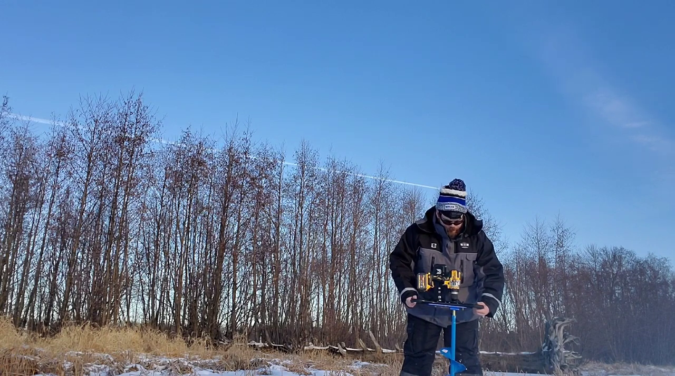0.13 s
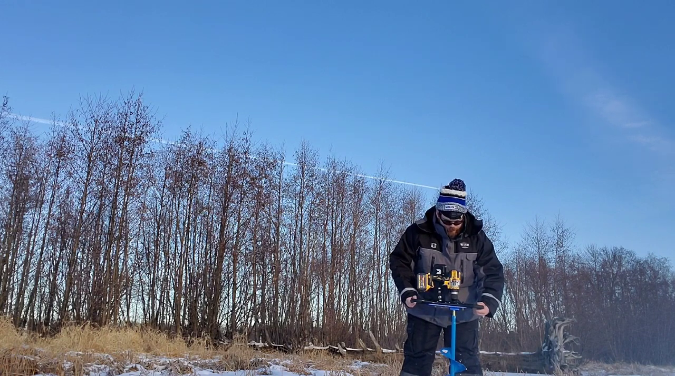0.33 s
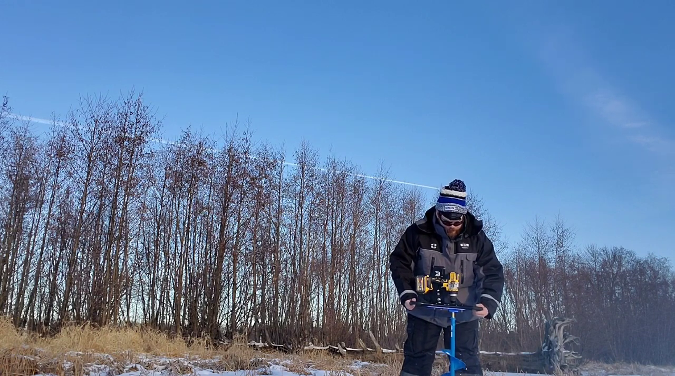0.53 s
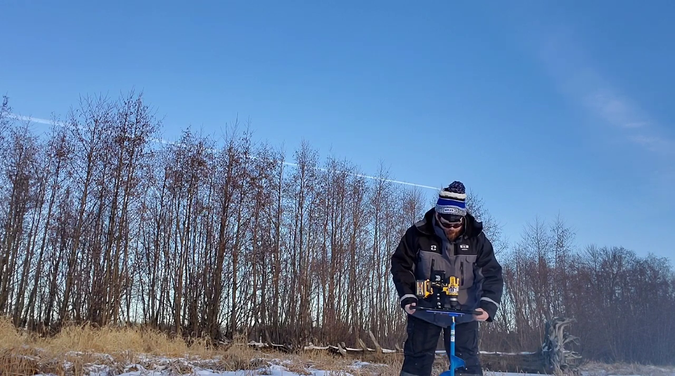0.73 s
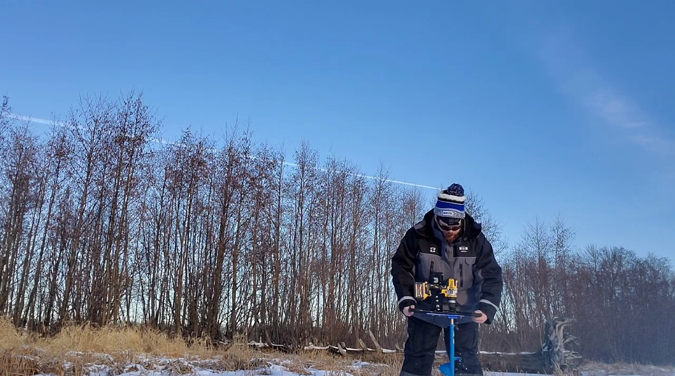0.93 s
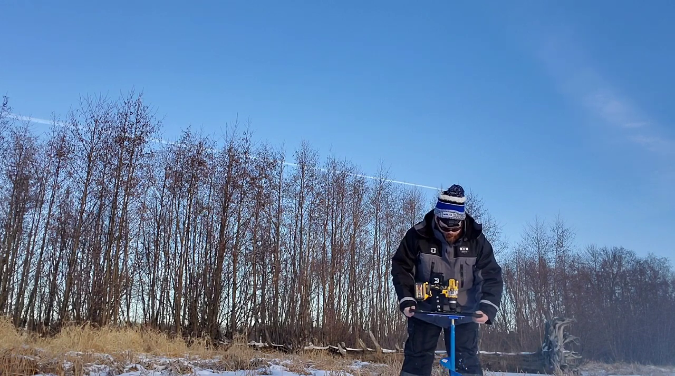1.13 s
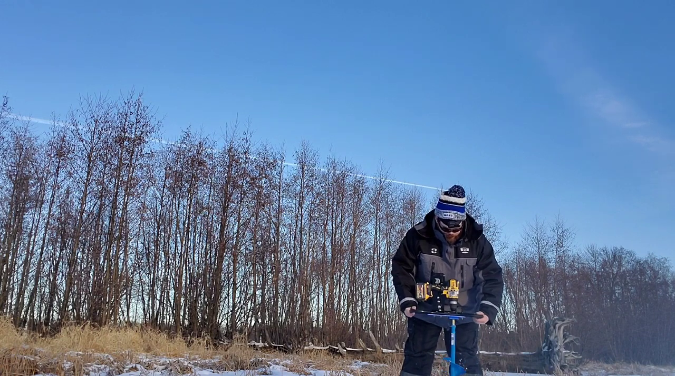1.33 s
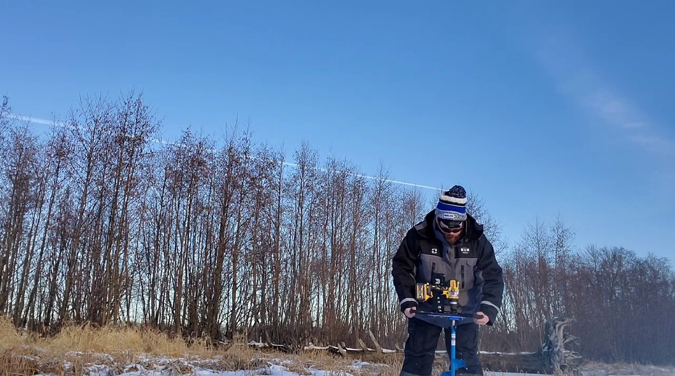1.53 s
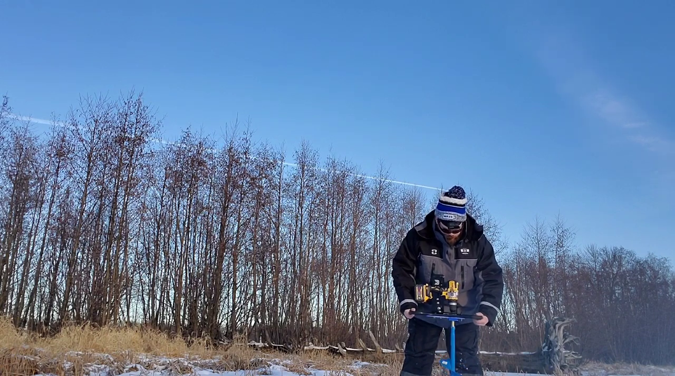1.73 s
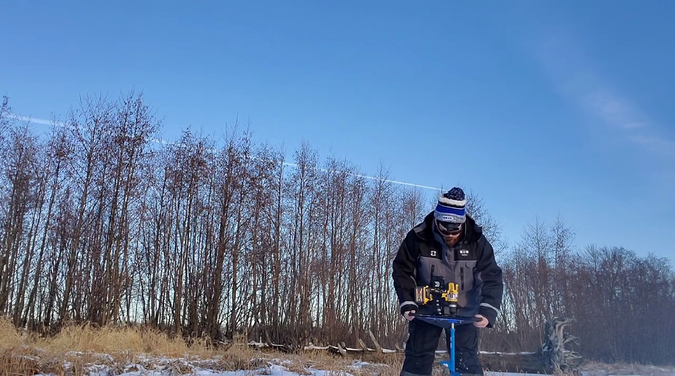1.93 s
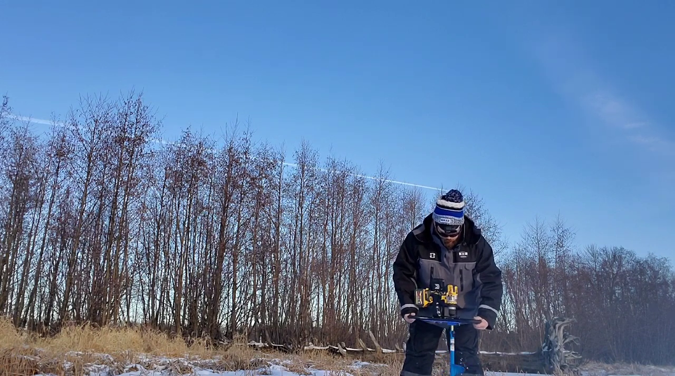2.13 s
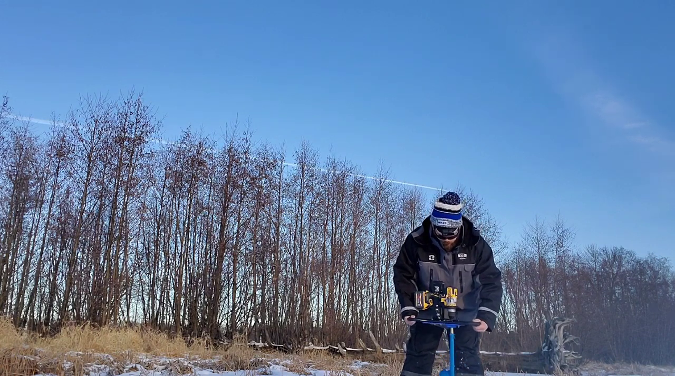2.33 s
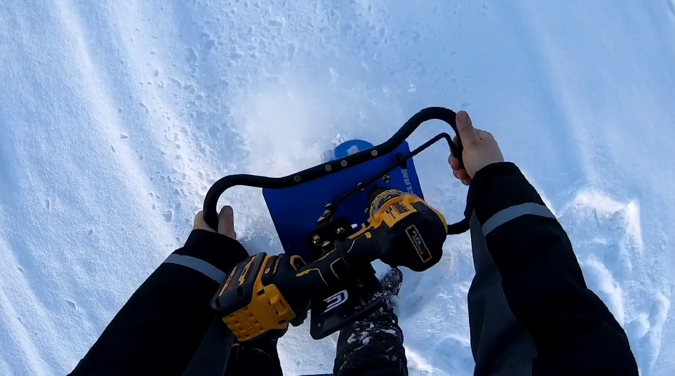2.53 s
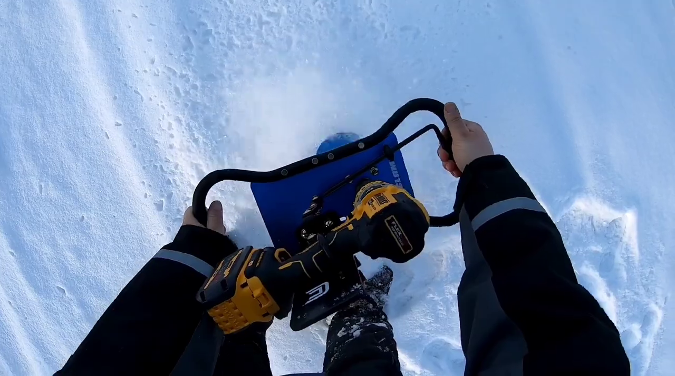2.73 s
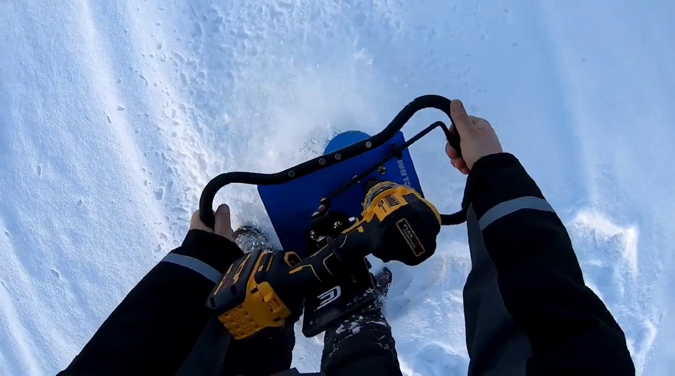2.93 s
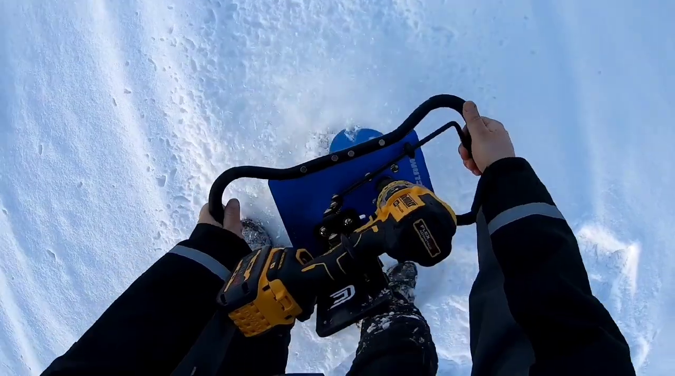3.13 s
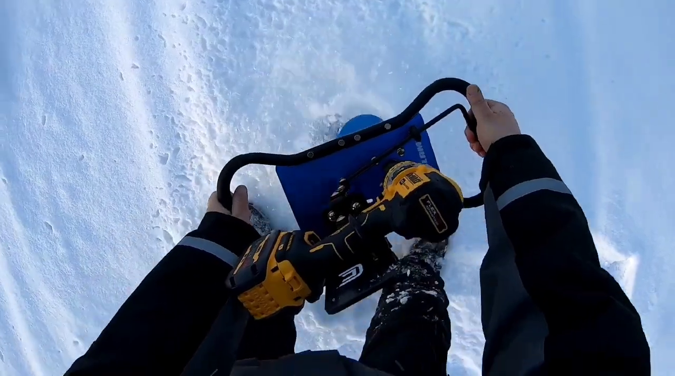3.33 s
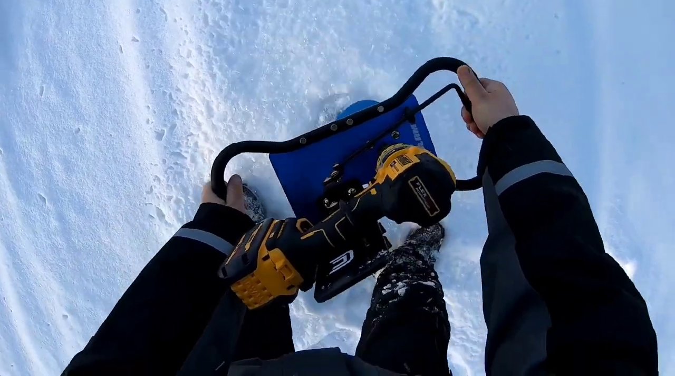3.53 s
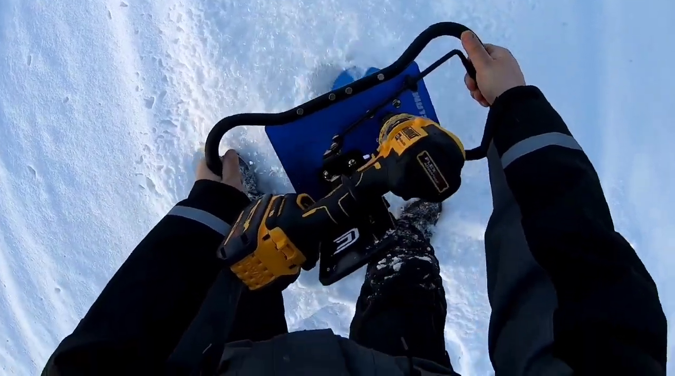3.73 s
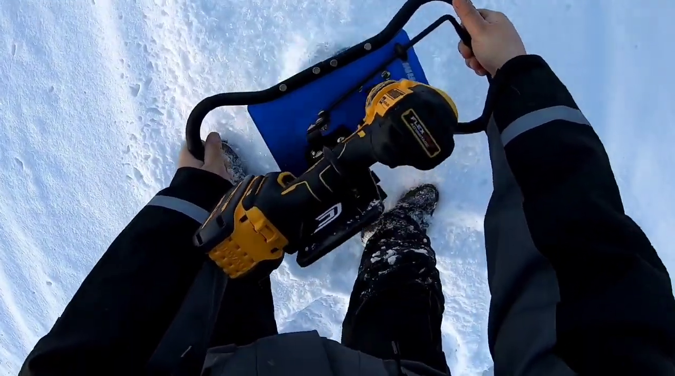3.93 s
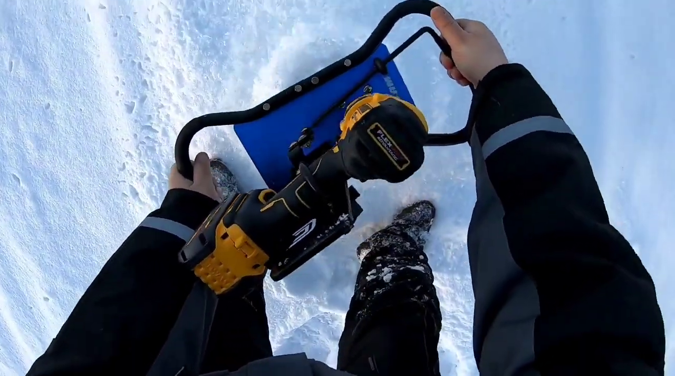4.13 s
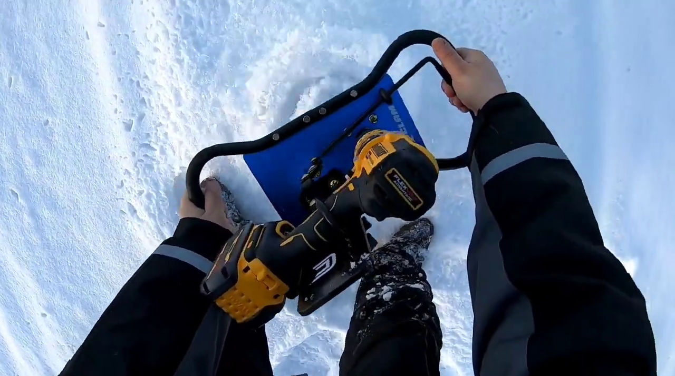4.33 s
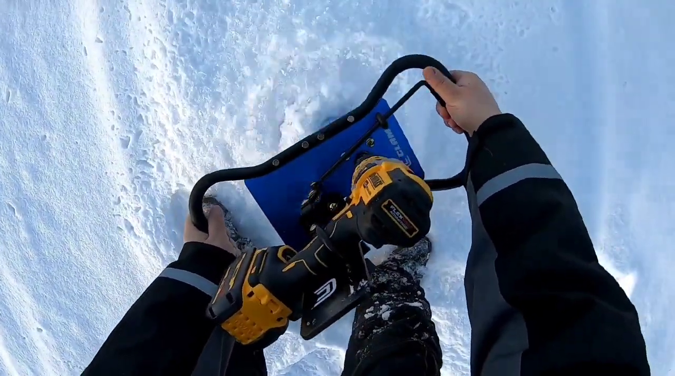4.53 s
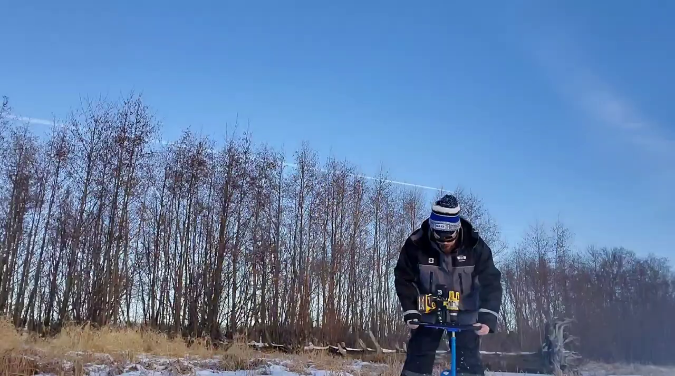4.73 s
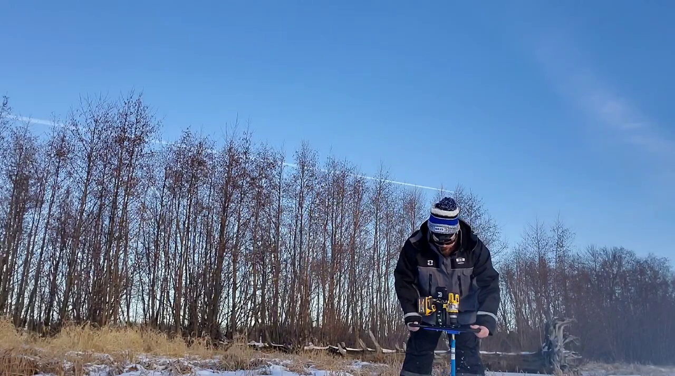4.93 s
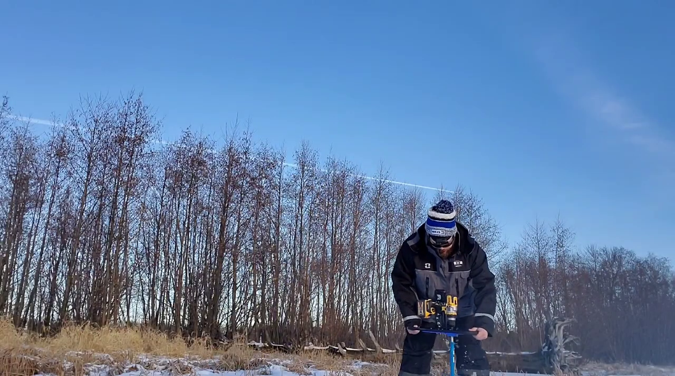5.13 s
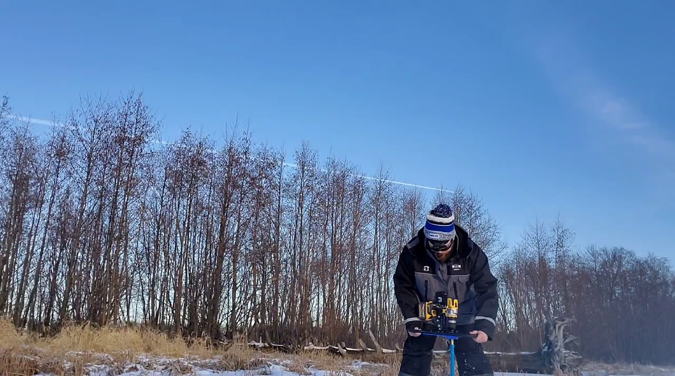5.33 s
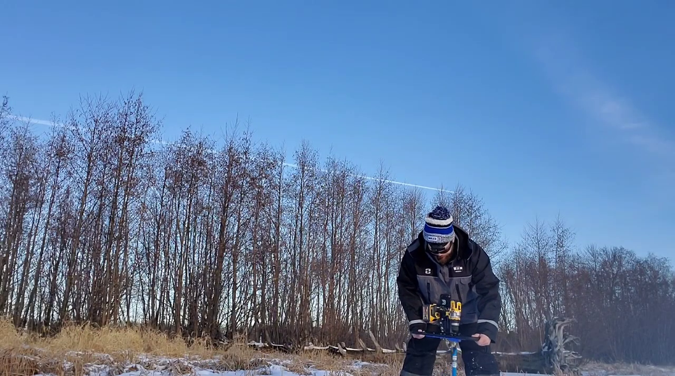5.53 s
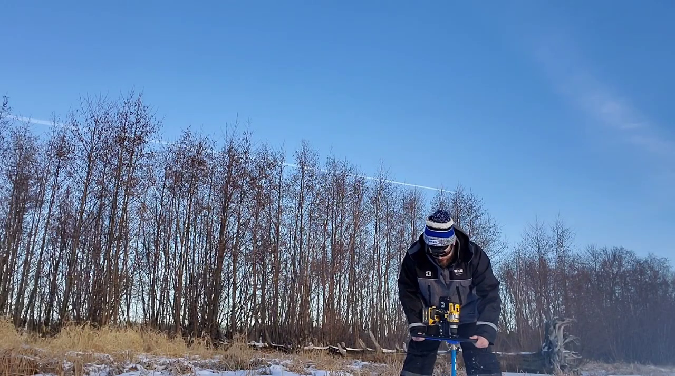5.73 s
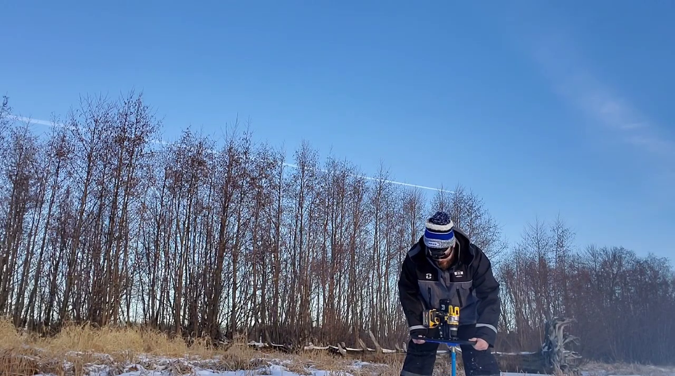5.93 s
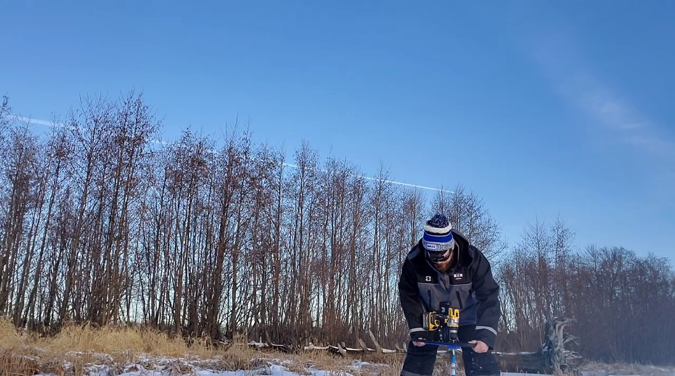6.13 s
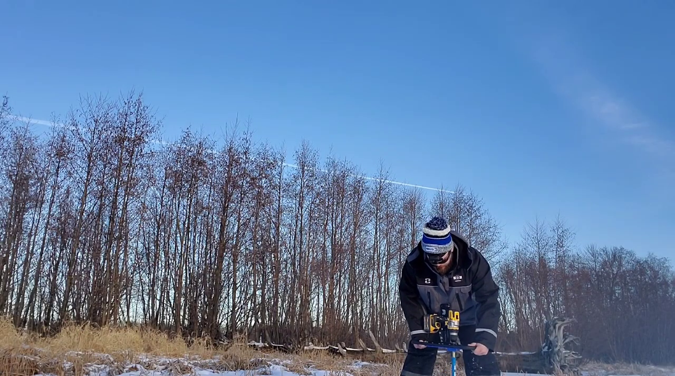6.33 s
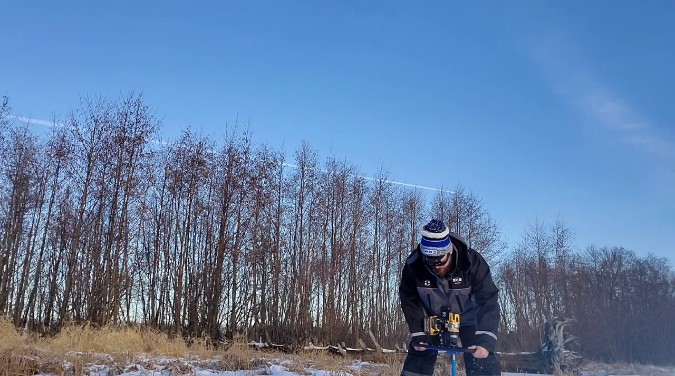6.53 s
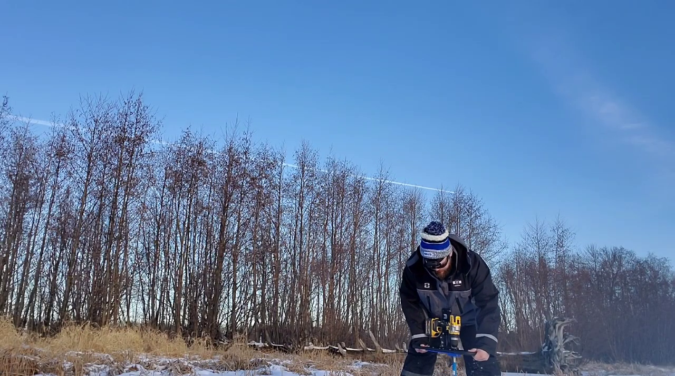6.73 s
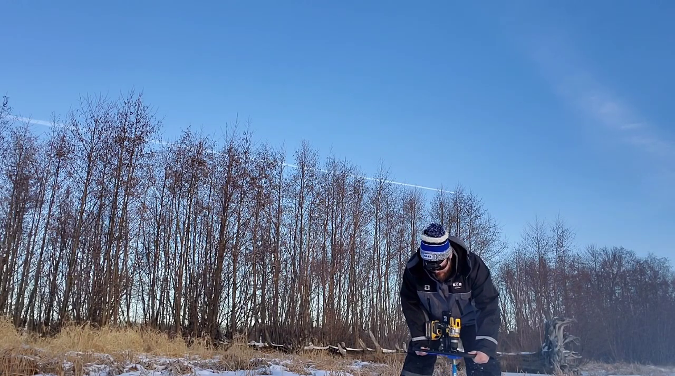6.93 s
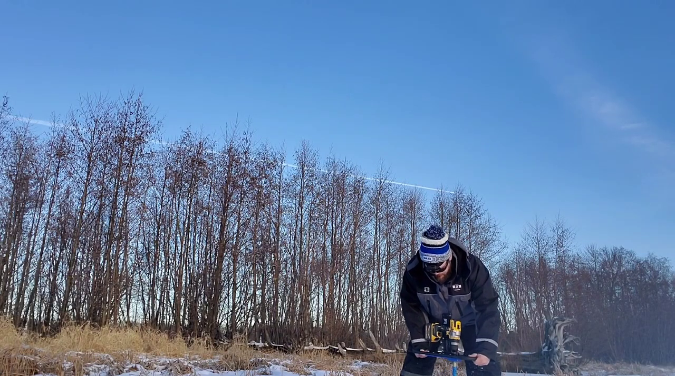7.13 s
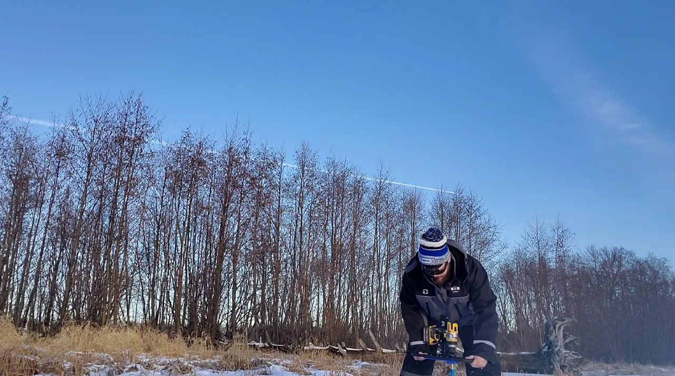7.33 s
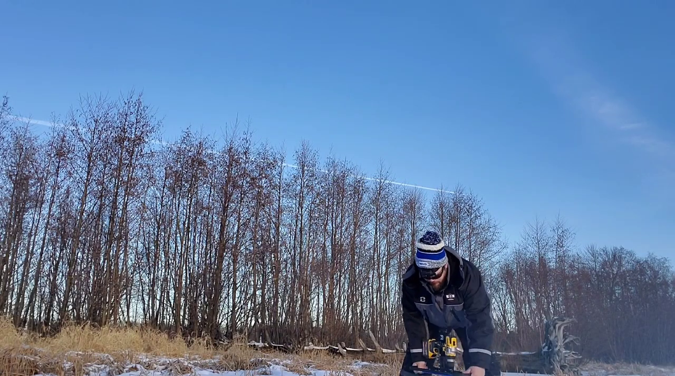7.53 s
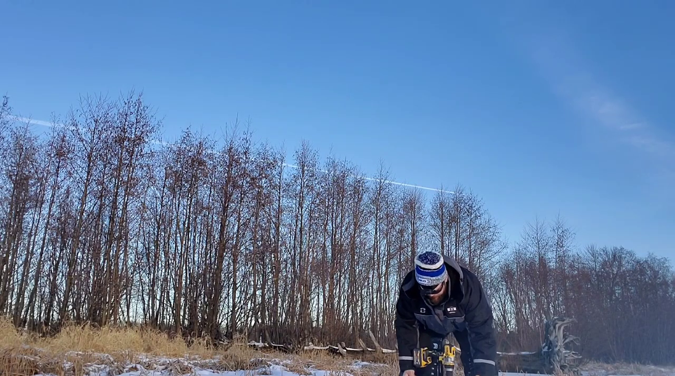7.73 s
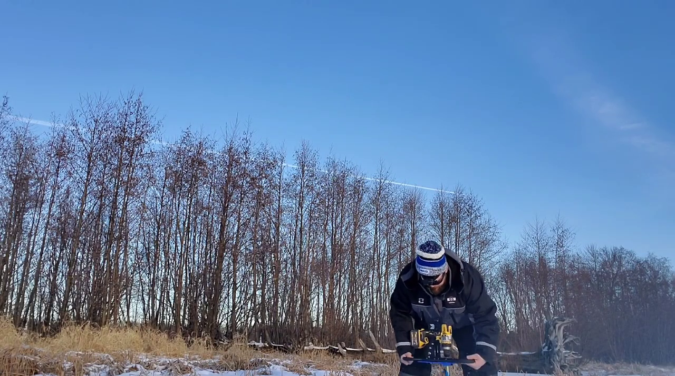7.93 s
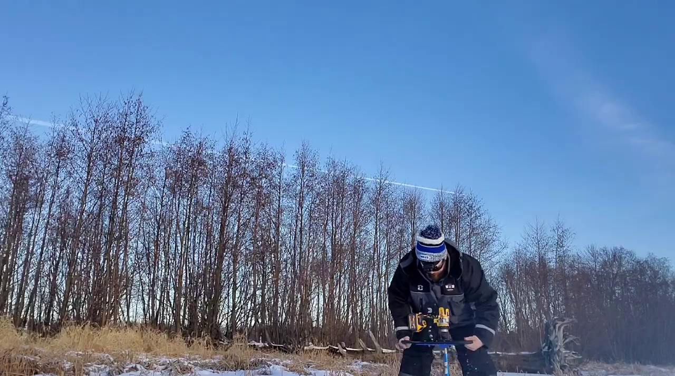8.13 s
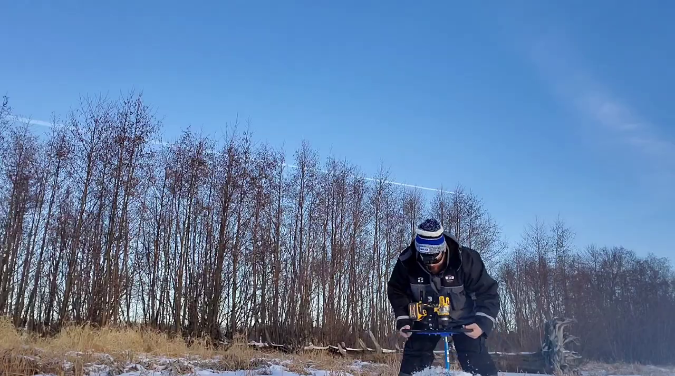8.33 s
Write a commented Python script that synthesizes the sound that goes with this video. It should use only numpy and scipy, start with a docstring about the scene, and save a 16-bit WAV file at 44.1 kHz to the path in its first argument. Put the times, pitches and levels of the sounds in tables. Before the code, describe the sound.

A light wind rumbles on the microphone at a frozen lake, with a few faint ice crunches. At about 0.5 seconds a drill-driven auger, some distance away, starts skimming the snow with a growing hiss. A crumb cracks at 1.2, and near 1.8 the blades bite into loud, ringing grinding with a bright spray of shavings. From 2.8 to 4.9 the sound is close, at the handles: fuller and lower, with a drone throbbing about seven times a second and a thin, wavering steel whine. Then it is distant again, darkening as the hole deepens, with a growing low shudder. Short blade squeaks come between 6.4 and 7.4. At about 7.7 the auger breaks through with a crunch, dull knocks and gulping slush, spins freely and stops near 8. Slush drains and crumbs rattle, then at 8.3 the drill restarts with a brief, high rising whine.

```python
"""A light wind rumbles on the microphone at a frozen lake; ice crumbs crunch, and a cordless drill
starts turning an ice auger. The blades skim the snow, bite, and shave chips that ring the steel and
spray out; the tone darkens as the hole deepens. We listen from the shore side, and for two seconds
from the handles, where the frame drones with each turn. The blades squeak on the wall, the auger
breaks through, churns slush and stops, and the drill whines up again."""
import sys
import numpy as np
from scipy import signal
from scipy.fft import irfft
from scipy.io import wavfile
from scipy.ndimage import uniform_filter1d, map_coordinates

SR = 44100
rng = np.random.default_rng(int(sys.argv[2]) if len(sys.argv) > 2 else 0)


def dump_mix(stems):
    """Bounce the given channels to the path in sys.argv[1] as a 16-bit WAV at rate SR."""
    frames = np.atleast_2d(stems).T  # one column per channel
    limited = np.clip(frames, -1, 1)  # hard clip at full scale
    pcm = np.round(limited * 32767).astype(np.int16)
    wavfile.write(sys.argv[1], SR, pcm)


N = 370440
TIME = np.arange(N) / SR
HZ = np.fft.rfftfreq(8192, 1 / SR)

CLOSE_FROM_S, CLOSE_TO_S = 2.764, 4.927  # microphone at the handles
SHUDDER_S, THROUGH_S = 5.12, 7.67  # the shudder carries to the shore; the auger breaks through
DRONE_BELOW_HZ, DRONE_THROB_DB = 727, 2.5  # the low ringing throbs with each turn
SWAY_LAG_RAD = 1.0  # pitch swings lag behind the hardest bite

# Shavings and snow hissing off the flights while the blades run free:
# (frequency [Hz], skimming the snow [dB], through the ice [dB])
FREE_HISS = [(350, -16, -5), (520, -4, -4.5), (850, 0.5, -4), (1400, 4, -1.5), (2040, -6, -5),
             (2580, -1, -1.5), (3820, -5.5, -11.5), (4500, -11.5, -14.5), (5600, -11, -10),
             (7850, -4.5, -5), (9523, -2.5, -3), (10500, 0.5, 2), (13500, 3.5, 6.5), (14600, -7.5, -1.5)]
# The auger spinning in the open hole: (start [s], end [s], grinding [dB], spray [dB], swell [dB/s])
FREE_SPINS = [(7.674, 7.956, -40.5, -30.5, -13), (8.269, 8.42, -40, -32.5, 25)]


def amp(db):
    """Decibels to gain."""
    return 10 ** (np.asarray(db) / 20)


def unit_power(x):
    """Scale to an RMS of one."""
    return x / np.sqrt(np.mean(x ** 2) + 1e-20)


def levels(rows):
    """One gain curve for each dB column of a table that starts with time."""
    times, *columns = np.transpose(rows)
    return [amp(np.interp(TIME, times, db)) for db in columns]


def spectrum(rows, column=1):
    """A column of dB joined on a log-frequency axis."""
    rows = np.array(rows)
    return np.interp(np.log(HZ + 1), np.log(rows[:, 0]), rows[:, column])


def band(lo_hz, hi_hz):
    """A pass band with steep skirts, in dB."""
    return -10 * np.log10((1 + (lo_hz / (HZ + 1)) ** 12) * (1 + (HZ / hi_hz) ** 16))


def colour(x, db):
    """Minimum-phase filter with the given spectrum; the result has unit power."""
    log_gain = np.log(amp(np.maximum(db, db.max() - 90)))
    mirrored = np.r_[log_gain, log_gain[-2:0:-1]]
    taps = np.fft.ifft(np.exp(np.conj(signal.hilbert(mirrored)))).real
    return unit_power(signal.oaconvolve(x, taps[:len(HZ)])[:len(x)])


def wander(rate_hz):
    """Random drift of unit power, mostly slower than rate_hz."""
    hz = np.fft.rfftfreq(N, 1 / SR)
    noise = rng.standard_normal(2 * len(hz)).view(complex)
    return unit_power(irfft(noise * hz / (hz + 4) / (1 + (hz / rate_hz) ** 2), N))


def during(start, end):
    """A gate with 8 ms edges."""
    return np.clip(np.minimum(TIME - start, end - TIME) / .008 + .5, 0, 1)


def swell(peak_s, width_s):
    """A smooth rise and fall around one moment."""
    return np.exp(-((TIME - peak_s) / width_s) ** 2)


def burst(start, db, length):
    """A quick swell that dies away."""
    age = np.arange(0, 2, 1 / (length * SR))
    shape = amp(db) * np.tanh(7 * age) * np.exp(-age ** 3)
    return np.r_[np.zeros(round(start * SR)), shape, np.zeros(N)][:N]


def resonate(x, hz, width_hz):
    """A steep-sided resonance that follows the curve hz; unit power."""
    carrier = np.exp(2j * np.pi * np.cumsum(hz) / SR)
    pole = np.exp(-np.pi * width_hz / SR)
    envelope = signal.lfilter([1], [1, -2 * pole, pole * pole], x / carrier)
    return unit_power((carrier * envelope).real)


def flicker(x, patch_db):
    """Narrow patches of the spectrum swell and fade every few hundredths of a second."""
    frames = signal.stft(x, nperseg=1024, noverlap=768)[2]
    patches = uniform_filter1d(rng.standard_normal(frames.shape), size=3, axis=0)
    patches = unit_power(uniform_filter1d(patches, size=9, axis=1))
    depth_db = np.interp(np.linspace(0, HZ[-1], len(frames)), HZ, patch_db + 0 * HZ)[:, None]
    gain = amp(depth_db * patches - depth_db ** 2 * np.log(10) / 20)  # holds the mean power
    return signal.istft(frames * gain, nperseg=1024, noverlap=768)[1][:N]


def chips(per_s, spread_db):
    """Tiny fractures at random moments, a few of them large."""
    size = amp(spread_db * np.minimum(rng.exponential(1, N), 4))
    return unit_power(size * rng.standard_normal(N) * (rng.random(N) < per_s / SR))


def crackle(hz, width_hz):
    """Fractures heard through one gliding resonance."""
    return resonate(chips(6000, 0.93), hz, width_hz)


def turn_angle():
    """Angle of the steadily turning auger, zero where the blades bite hardest."""
    hardest_s, turn_s = 2.81, 0.1462
    return 2 * np.pi * (TIME - hardest_s) / turn_s


def wind():
    """Lumpy rumble on the microphone and a faint rush in the trees."""
    # Wind strength in the two stretches on the shore side: (time [s], relative level [dB])
    stretches = [
        [(0.05, -44), (0.08, -46), (1.75, -42.5), (2.7, -54)],
        [(5.0, -50), (5.12, -51), (7.3, -49), (7.8, -45.5), (8.35, -50)],
    ]
    # Spectrum of the buffeting on the microphone: (frequency [Hz], level [dB])
    rumble_colour = [(15, -25), (30, -14), (48, -4), (64, 3.5), (85, 0), (120, -11), (190, -18), (250, -29),
                     (400, -42), (900, -88)]
    # Spectrum of the air in the trees: (frequency [Hz], level [dB])
    trees_colour = [(100, 0), (350, -12), (600, -1), (900, 1.5), (1600, 0), (2200, -10), (3000, -33),
                    (12000, -36)]
    buffets = rng.standard_normal(N) * amp(1.6 * wander(12.35))
    rumble = colour(buffets, spectrum(rumble_colour)) * levels(np.vstack(list(stretches)))[0]
    trees = colour(rng.standard_normal(N), spectrum(trees_colour))
    return amp(1.0) * rumble + amp(-57.5) * trees


def slush():
    """Wet lumps splash and boom in the hole's air column; crumbs rattle off the flights."""
    # Slush thrown about by the flights: (time [s], relative level [dB], length [s])
    sloshes = [(7.612, -29, 0.06), (7.709, -29, 0.022), (7.734, -31, .018), (7.818, -28.5, 0.018),
               (7.838, -30, 0.018), (7.875, -25.5, 0.026), (7.91, -33, 0.035), (7.984, -35, 0.02),
               (8.017, -36, 0.04), (8.093, -35.5, .025), (8.135, -45, .07), (8.235, -43, .04)]
    # Spectrum of the wet lumps: (frequency [Hz], level [dB])
    lump_colour = [(60, -26), (130, 2.5), (190, 2.5), (380, -2), (600, -11.5), (1100, -11), (2000, -11),
                   (4000, -43), (9000, -56)]
    # Ice crumbs that crunch and scatter: (time [s], level [dB], length [s])
    crunches = [(.289, -63, .015), (.31, -65, 0.04), (.345, -59, .03), (0.375, -58, 0.06), (.43, -56, .03),
                (0.463, -49, 0.061), (1.209, -30.5, 0.028), (7.878, -26, 0.02), (7.957, -27.5, .008),
                (8.022, -38, 0.024), (8.043, -32, .008), (8.062, -38.5, .013), (8.111, -36.5, 0.01),
                (8.124, -34, 0.009), (8.14, -43, .013), (8.162, -43.5, .011), (8.223, -37, 0.007),
                (8.26, -47, .01), (8.272, -32, .007)]
    hole_hz = 185
    booms = sum(burst(start, db, length) * np.sin(2 * np.pi * hole_hz * (TIME - start))
                for start, db, length in sloshes)
    lumps = colour(chips(3500, 1.0), spectrum(lump_colour)) * sum(burst(*row) for row in sloshes)
    brightness_db = 2 * np.log2((HZ + 100) / 8000)
    crumbs = colour(chips(11000, 1.5), spectrum(FREE_HISS) + band(1800, 20000) + brightness_db)
    return amp(-7) * booms + amp(-1.5) * lumps + crumbs * sum(burst(*row) for row in crunches)


def knocks():
    """Loose lumps of ice strike the flights with short dull blows."""
    # Lumps hitting the steel: (time [s], level [dB])
    strikes = [(7.667, -27), (7.738, -24), (7.748, -23.5), (7.821, -23), (7.842, -31), (7.89, -28)]
    # What each blow rings with: (frequency [Hz], level [dB], 60 dB decay time [s])
    modes = [(185, -1.5, .03), (400, -1, .014), (900, -7, .008)]
    t = np.arange(0, .1, 1 / SR)
    blow = sum(amp(db - 60 * t / t60) * np.sin(2 * np.pi * hz * t) for hz, db, t60 in modes)
    hits = np.zeros(N)
    for start, db in strikes:
        hits[round(start * SR)] = amp(db)
    return signal.oaconvolve(hits, blow)[:N]


def squeaks_and_gulps():
    """Short unsteady tones: blades rub the wall, the free auger rings, water gulps in the hole."""
    # Blade squeaks, about one a turn: (time [s], level [dB])
    squeaks = [(6.412, -34), (6.564, -32), (6.721, -25.5), (6.883, -32), (7.037, -26), (7.443, -37)]
    # Gulps and a ring of steel: (time [s], level [dB], length [s], pitch [Hz], waver [Hz])
    gulps_and_ring = [(7.652, -31.5, .032, 155, 10), (7.785, -42.5, 0.12, 2990, 50),
                      (7.93, -35, .02, 290, 15), (8.371, -31, .03, 365, 20)]
    squeak_s, squeak_hz, squeak_waver_hz = 0.027, 3010, 44.3
    tones = [(start, db, squeak_s, squeak_hz, squeak_waver_hz) for start, db in squeaks]
    waver, out = wander(130), np.zeros(N)
    for start, db, length, hz, waver_hz in tones + gulps_and_ring:
        shape = burst(start, db, length)
        at = np.flatnonzero(shape)
        phase = 2 * np.pi * np.cumsum(hz + waver_hz * waver[at]) / SR
        out[at] += shape[at] * np.sqrt(2) * np.sin(phase)
    return out


def motor_spin_up():
    """The motor restarts: a brief, rough, rising whine with a weaker gear tone three octaves below."""
    from_hz, top_hz, lag_s = 7250, 12000, 0.075
    elapsed = np.maximum(TIME - FREE_SPINS[1][0], 0)
    hz = top_hz + (from_hz - top_hz) * np.exp(-elapsed / lag_s)
    phase = 2 * np.pi * np.cumsum(hz * (1 + .014 * wander(500))) / SR
    gear = amp(-23) * np.sin(phase / 8)
    return amp(-28.5) * swell(peak_s=8.362, width_s=.028) * (np.sin(phase) + gear)


def air_column(depth_m, width_hz):
    """The hole is a quarter-wave pipe that booms lower as it deepens."""
    sound_m_per_s = 331
    return crackle(sound_m_per_s / depth_m / 4, width_hz)


def hole_from_shore():
    """At a distance the boom of the hole comes out slowly until the auger is through."""
    feed_m_per_s, growth_db_per_s = 0.11, 2.5
    elapsed = np.maximum(TIME - CLOSE_TO_S, 0)
    gain = amp(-48.5 + growth_db_per_s * elapsed) * during(SHUDDER_S, THROUGH_S)
    return gain * air_column(depth_m=0.24 + feed_m_per_s * elapsed, width_hz=127)


def breakthrough():
    """The last skin of ice gives way in a short falling crunch."""
    give_s, give_hz, octaves_per_s = 7.65, 1390, 12
    hz = give_hz * 2 ** (-octaves_per_s * np.clip(TIME - give_s, -.1, .1))
    return amp(-30.5) * swell(give_s, width_s=0.034) * crackle(hz, width_hz=700)


def loaded_whine():
    """Under load, drill and auger hold tones that sag, swing with each turn and tremble."""
    # Tones under load: (start [s], end [s], pitch [Hz], sag [Hz/s], swing [Hz], waver [Hz],
    # level [dB], roughness [dB])
    tones = [(3.0, 4.95, 2785, 12, -26, 28, -37, 6), (3.3, 4.95, 560, 0, 26, 20, -37.5, 4),
             (5.0, 7.8, 514, 7, 8, 15, -45, 3.5), (5.6, 7.8, 1672, 10, 4, 12, -42, 2),
             (4.9, 7.75, 7364, 0, 8, 28, -39.5, 4)]
    out, swing = np.zeros(N), np.cos(turn_angle() - SWAY_LAG_RAD)
    for start, end, hz, sag_hz_per_s, swing_hz, waver_hz, db, rough_db in tones:
        at = np.flatnonzero((TIME > start) & (TIME < end))
        pitch = hz - sag_hz_per_s * (TIME[at] - start) + swing_hz * swing[at] + waver_hz * wander(57)[at]
        tremble = amp(rough_db * np.tanh(wander(60)[at]))
        tone = np.sin(2 * np.pi * np.cumsum(pitch) / SR) * tremble
        out[at] += amp(db) * unit_power(tone) * signal.windows.tukey(len(at), .2)
    return out


def singing_steel():
    """Close up, the catching blades keep a few modes chattering; the low one throbs with the turns."""
    # Narrow modes of the loaded steel, silent unless the end follows the start:
    # (start [s], end [s], pitch [Hz], swing [Hz], width [Hz], level [dB], catches [1/s])
    modes = [(2.9, 4.92, 2778, -23, 70, -33.5, 110), (4.58, 4.95, 3000, -25, 70, -32, 220),
             (5.1, 4.95, 1675, 9, 46, -37.5, 400), (3.0, 4.92, 555, 30, 63, -39, 2000)]
    out, swing = np.zeros(N), np.cos(turn_angle() - SWAY_LAG_RAD)
    throb = amp(DRONE_THROB_DB * np.cos(turn_angle()) * during(CLOSE_FROM_S, CLOSE_TO_S))
    for start, end, hz, swing_hz, width_hz, db, per_s in modes:
        at = np.flatnonzero((TIME > start) & (TIME < end))
        catches = rng.choice([-1, 1], len(at)) * (rng.random(len(at)) < per_s / SR)
        tone = resonate(catches, hz + swing_hz * swing[at], width_hz)
        if hz < DRONE_BELOW_HZ:
            tone *= throb[at]
        out[at] += amp(db) * tone * signal.windows.tukey(len(at), .2)
    return out


def ring_auger(fractures, shape, modes, passband, depth):
    """Fractures ring the auger, whose colour shifts as it sinks from depth 0 (shallow) to 1 (deep)."""
    shallow_db, deep_db = spectrum(shape, column=1), spectrum(shape, column=2)
    for hz, width_hz, shallow_peak_db, deep_peak_db in modes:
        peak = 1 / (1 + (2 * (HZ - hz) / width_hz) ** 2)
        shallow_db += shallow_peak_db * peak
        deep_db += deep_peak_db * peak
    shallow = colour(fractures, shallow_db + passband)
    deep = colour(fractures, deep_db + passband)
    return (1 - depth) * shallow + depth * deep


def sway(x, share):
    """The pitch of a ringing swings by about this share, once in each turn of the auger."""
    speed = 1 + share * (np.cos(turn_angle() - SWAY_LAG_RAD) + .5 * wander(14.6))
    position = np.cumsum(speed - uniform_filter1d(speed, size=13000) + 1) - 1
    return map_coordinates(x, [position], order=3, mode="nearest")


def auger_at_handles():
    """Each turn throws a puff of shavings, then loads the blades so that the frame drones."""
    # Broad colour of the cutting, close up: (frequency [Hz], shallow hole [dB], deep hole [dB])
    shape = [(45.2, -31, -31), (106, -12, -11), (207, -9, -13.5), (347, -13.5, -18.5), (650, -19, -18),
             (960, -21.5, -18.5), (1430, -17, -15), (2300, -11, -12.5), (3460, -12.5, -12.5),
             (4550, -12, -13.5), (5200, -13, -9), (6160, -20, -10), (8380, -20, -18.5), (10100, -31, -26)]
    # Resonances of auger, frame and hole, close up, and the valleys between them:
    # (frequency [Hz], width [Hz], shallow hole [dB], deep hole [dB])
    modes = [(177, 160, 0.5, 8), (570, 180, 10.5, 13), (780, 154, 14.5, 7.5), (1023, 42, 10.5, 7.4),
             (1230, 140, 7, 6), (1300, 100, -1, -4), (1690, 270, 5.5, 8.5), (1950, 80, -6, 2.5),
             (1996, 70, 0, 4.5), (2520, 54, 2.5, 7), (2796, 340, 6, 8.5), (3390, 260, 5, 2.5),
             (4700, 100, 1, 1.8), (5750, 150, 1.5, 2), (6230, 150, -3, -9), (7270, 460, 8, 0)]
    grind_sink_db_per_s, spray_growth_db_per_s = .5, 0.32
    feed_m_per_s, boom_rise_s = 0.15, 0.65
    angle, elapsed = turn_angle(), TIME.clip(CLOSE_FROM_S, CLOSE_TO_S) - CLOSE_FROM_S
    depth = np.clip((TIME - 3.2) / 0.7881, 0, 1)
    bite_db = DRONE_THROB_DB * (np.cos(angle) * (.5 + .4 * depth) - .25 * (1 - depth))
    puff_db = 1.7 * (1 - depth) * np.cos(angle + 1.9)  # the puffs even out as the hole deepens
    shudder_gain = amp(-35.5 + 1.6 * wander(25))
    grind_gain = amp(-21 - grind_sink_db_per_s * elapsed)
    spray_gain = amp(-24.5 + spray_growth_db_per_s * elapsed + puff_db)
    shudder = ring_auger(chips(2000, 2.6), shape, modes, band(40, 433), depth)
    grind = ring_auger(chips(16000, 1.1) * amp(.5 * wander(50)), shape, modes, band(389, 3700), depth)
    shavings = chips(20000, 0.56) * amp(0.38 * wander(52))
    spray = ring_auger(shavings, shape, modes, band(3380, 12000), depth)
    drone = signal.sosfiltfilt(signal.butter(3, DRONE_BELOW_HZ, fs=SR, output="sos"), grind)
    grind = grind - drone + sway(drone, share=.04) * amp(bite_db + 1.1)
    cutting = shudder * shudder_gain + grind * grind_gain + spray * spray_gain
    boom_gain = amp(-38.5) * np.minimum(elapsed / boom_rise_s, 1)
    boom = boom_gain * air_column(depth_m=0.251 + feed_m_per_s * elapsed, width_hz=67)
    dull_microphone = signal.firwin(301, 10300, window=("kaiser", 8), fs=SR)
    return signal.oaconvolve(flicker(cutting, patch_db=2.0) + boom, dull_microphone, "same")


def distant_ringing(fractures, passband):
    """The whole auger rings in solid ice; before and after, loose grains bring out only the regular comb of
    peaks above 3.6 kHz."""
    # Broad colour of the cutting, at a distance: (frequency [Hz], shallow hole [dB], deep hole [dB])
    shape = [(280, -30.5, -16), (438, -19, -14.5), (630, -11, -16.5), (1260, -14, -12.5),
             (2150, -11.5, -12.5), (3520, -13.5, -17.5), (3690, -15.5, -21.5), (4760, -9, -12),
             (5400, -9, -10), (8500, -5.5, -7), (9700, -7.5, -10.5), (10340, -4, -7), (13200, -2.5, -3.5),
             (14400, -7.5, -8)]
    # Peaks and valleys at a distance: resonances of auger, frame and hole lower down, and above 3.6 kHz a
    # regular comb of peaks and notches about 290 Hz apart: # (frequency [Hz], width [Hz], shallow hole [dB],
    # deep hole [dB])
    modes = [(520, 154, 12.5, 12), (725, 100, -5, -4.5), (835, 172, 1.5, 5), (1035, 181, 5, 5),
             (1365, 151, 8, 1.7), (1672, 165, 4, 7.5), (1885, 210, 4.5, 2.5), (2135, 110, -4.5, 0),
             (2440, 236, 7, 5), (2702, 124, 11, 8), (2982, 165, 9.5, 9.5), (3290, 220, 9.5, 8.5),
             (3620, 185, 7.5, 6.5), (3720, 110, 3, 3), (3850, 100, -3.5, -4), (3990, 140, 4.5, 6),
             (4150, 90, -4, -3), (4270, 120, 3, 5), (4425, 120, -4, -6.5), (4570, 100, 2.5, 2),
             (4730, 90, -2.5, -2), (4880, 110, 3, 2), (5040, 100, -3, -1.5), (5480, 160, 7.5, 3.5),
             (5640, 100, -3.5, -2), (5800, 140, 4, 2), (6010, 150, 2, 4), (6200, 110, -2.5, -2),
             (6410, 120, 4, 3.5), (6570, 110, -4.5, -6.5), (6775, 110, 6, 5), (6890, 80, -3, -4),
             (7070, 130, 3.5, 4), (7230, 90, -4, -5), (7375, 120, 6, 7.5), (7720, 220, 4, 3),
             (8030, 220, 2.5, 3.5)]
    high_comb = [mode for mode in modes if mode[0] > 3650]
    depth = np.clip((TIME - 4.4) / 2.3, 0, 1)
    biting = np.interp(TIME, [1.6, 2.0, 7.62, 7.72], [0.27, 1, 0.99, 0.1])
    in_ice = ring_auger(fractures, shape, modes, passband, depth)
    running_free = ring_auger(fractures, FREE_HISS, high_comb, passband, depth)
    return biting * in_ice + (1 - biting) * running_free


def distant_gains():
    """Relative gains of grinding, spray and shudder as the auger bites, sinks, spins free and drains."""
    # The blades skim the snow, then bite: (time [s], grinding [dB], spray of shavings [dB])
    bite = [(0.48, -58, -50), (0.58, -54, -49), (0.59, -53.5, -48.5), (0.74, -44, -39.5), (0.78, -42, -42),
            (0.94, -45, -38), (1.55, -42, -36), (1.76, -34.5, -28), (1.83, -29.5, -22), (1.92, -31, -23.5),
            (1.97, -28, -22.5), (2.21, -26.5, -19.5), (2.71, -28, -23.5), (2.72, -29.5, -23.5)]
    start_s, ease_s, settle_s = 0.43, 0.046, 0.62
    spray_sink_db_per_s, shudder_growth_db_per_s, drain_fade_db_per_s = 1.42, 6, 25
    elapsed = np.maximum(TIME - CLOSE_TO_S, 0)
    deep = amp([-31 + 4.5 * np.exp(-elapsed / settle_s), -22.5 - spray_sink_db_per_s * elapsed])
    cutting = during(start_s, THROUGH_S) * np.clip((TIME - start_s) / ease_s, 0, 1)
    grind, spray = np.where(TIME < (CLOSE_FROM_S + CLOSE_TO_S) / 2, levels(bite), deep) * cutting
    shudder = amp(-37 + shudder_growth_db_per_s * (TIME - THROUGH_S)) * during(SHUDDER_S, THROUGH_S)
    for start, end, grind_db, spray_db, swell_db_per_s in FREE_SPINS:
        spin = during(start, end) * amp(swell_db_per_s * (TIME.clip(start, end) - (start + end) / 2))
        grind += amp(grind_db) * spin
        spray += amp(spray_db) * spin
        shudder += amp(-49) * spin
    # Between the two spins, slush drains off the flights.
    stop, restart = FREE_SPINS[0][1], FREE_SPINS[1][0]
    drain_db = -drain_fade_db_per_s * np.maximum(TIME - stop, 0) + 1.7 * wander(22)
    drain = during(stop, restart) * amp(drain_db)
    return grind + amp(-49.5) * drain, spray + amp(-46) * drain, shudder + amp(-47) * drain


def auger_from_shore():
    """Grinding blades and a bright spray of shavings share the chatter of the cut; the frame shudders."""
    # Spectrum of the shuddering frame: (frequency [Hz], level [dB])
    shudder_colour = [(50, -20), (100, -6.5), (175, 0.5), (240, -1), (330, -2.5), (420, -15), (700, -36),
                      (2000, -57)]
    # How far the sound flickers: (frequency [Hz], depth [dB])
    flicker_depth = [(200, 4.8), (500, 1.8), (1000, 3.6), (1700, 2.6), (3000, 2.1), (4500, 4.4),
                     (6000, 2.6), (9000, 2.9), (14000, 2.2)]
    blade_hz, blade_db = 12.8, .3  # deep in the hole the two blades rasp in turn
    grind_gain, spray_gain, shudder_gain = distant_gains()
    rasp_db = blade_db * np.cos(2 * np.pi * blade_hz * TIME) * (TIME > CLOSE_TO_S)
    chatter_db = 0.51 * wander(16) + rasp_db
    grind = distant_ringing(chips(10000, 0.53) * amp(chatter_db + 0.71 * wander(25)), band(355, 4040))
    spray = distant_ringing(chips(22000, 0.56) * amp(chatter_db + 0.13 * wander(90)), band(3900, 17300))
    shudder = colour(chips(900, 1.5) * amp(1.5 * wander(11)), spectrum(shudder_colour)) * shudder_gain
    mix = amp(0.36) * grind * grind_gain + amp(0.5) * spray * spray_gain + amp(-1.0) * shudder
    return flicker(mix, spectrum(flicker_depth))


def scene():
    """The listening point jumps from the shore side to the handles and back; both channels are alike."""
    close = uniform_filter1d(1. * ((TIME > CLOSE_FROM_S) & (TIME < CLOSE_TO_S)), size=500)
    shore = (auger_from_shore() + hole_from_shore() + breakthrough() + slush() + knocks()
             + squeaks_and_gulps() + motor_spin_up() + wind())
    mono = (1 - close) * shore + close * auger_at_handles() + singing_steel() + loaded_whine()
    return np.array([mono, mono])


def record(dry):
    """The recorder passes nothing much above 14.7 kHz."""
    lowpass = signal.firwin(801, 14740, window=("kaiser", 9), fs=SR)
    return signal.oaconvolve(dry, lowpass[None], "same")


dry = scene()
out = record(dry)
dump_mix(out)
```